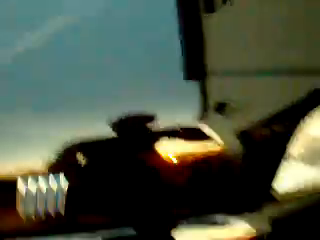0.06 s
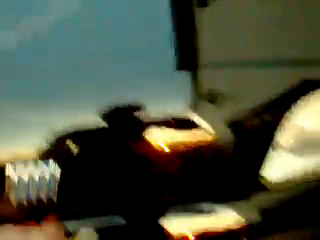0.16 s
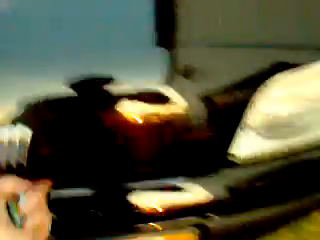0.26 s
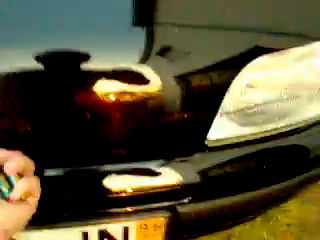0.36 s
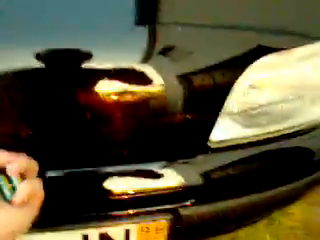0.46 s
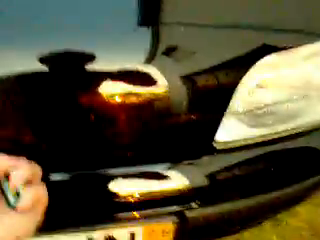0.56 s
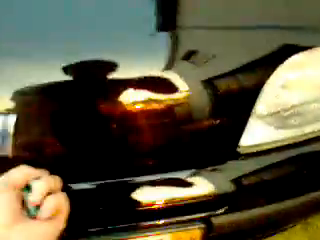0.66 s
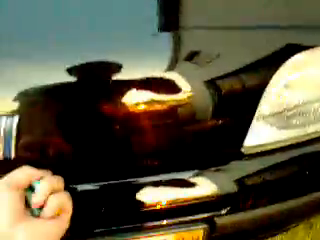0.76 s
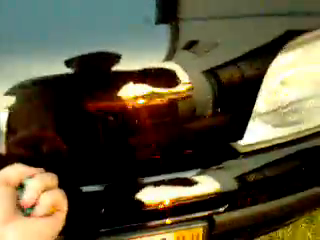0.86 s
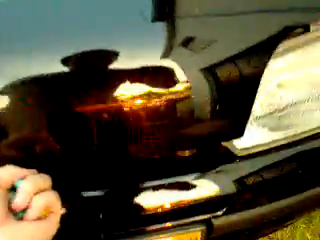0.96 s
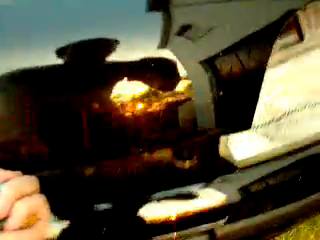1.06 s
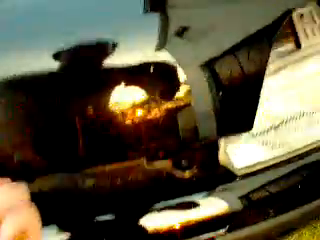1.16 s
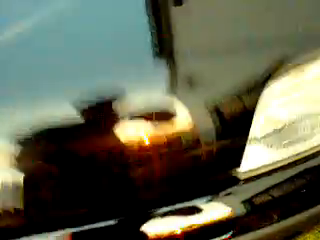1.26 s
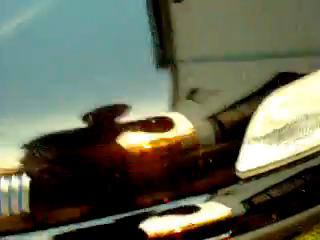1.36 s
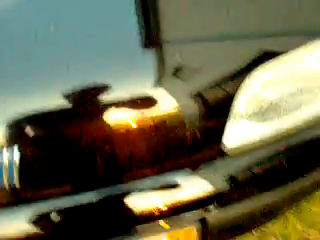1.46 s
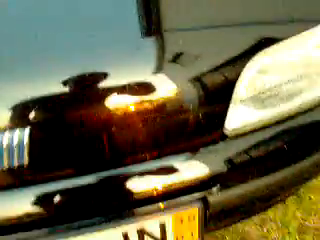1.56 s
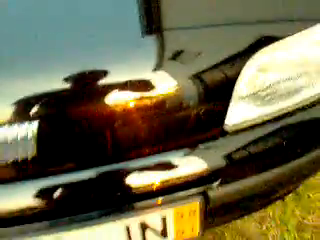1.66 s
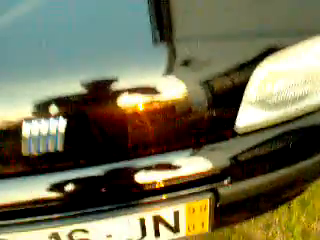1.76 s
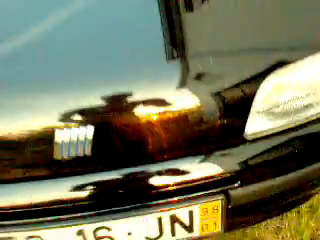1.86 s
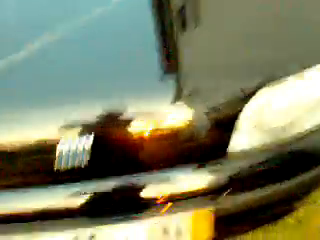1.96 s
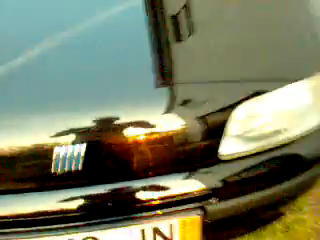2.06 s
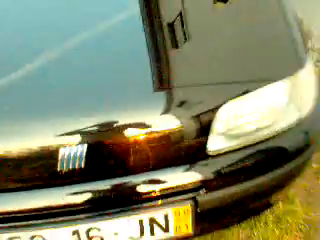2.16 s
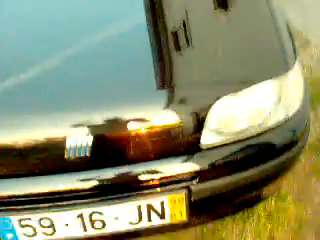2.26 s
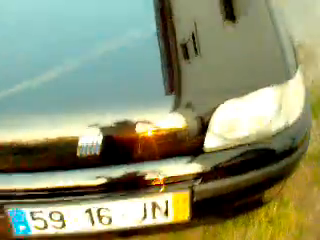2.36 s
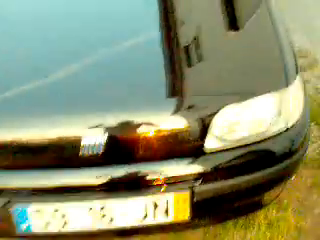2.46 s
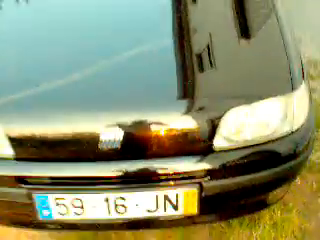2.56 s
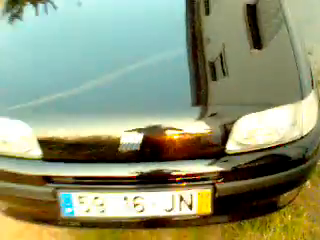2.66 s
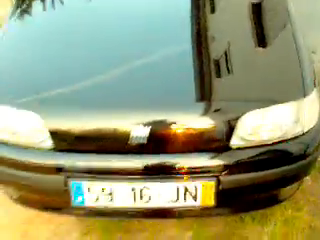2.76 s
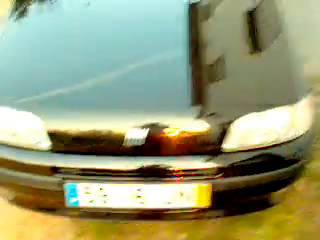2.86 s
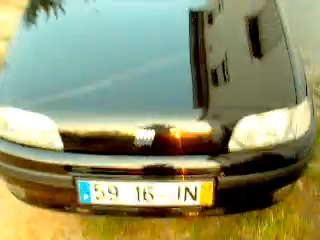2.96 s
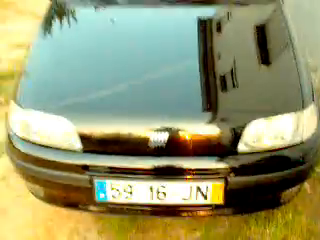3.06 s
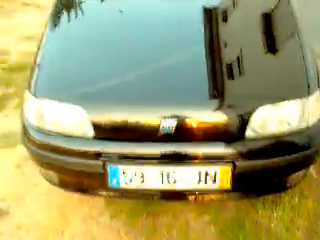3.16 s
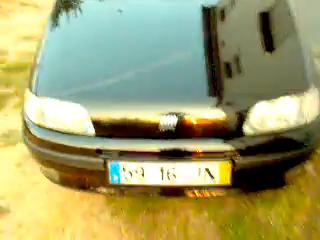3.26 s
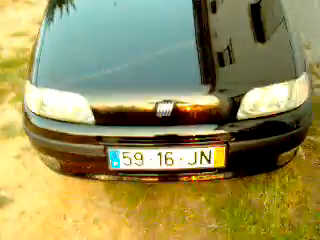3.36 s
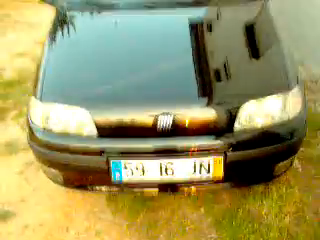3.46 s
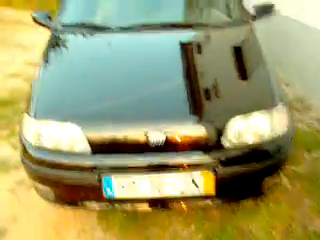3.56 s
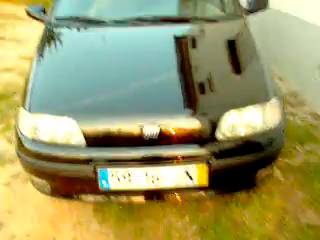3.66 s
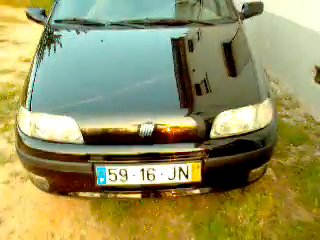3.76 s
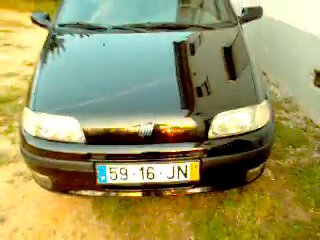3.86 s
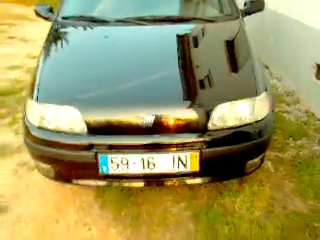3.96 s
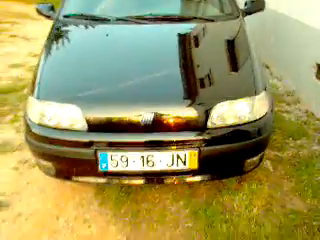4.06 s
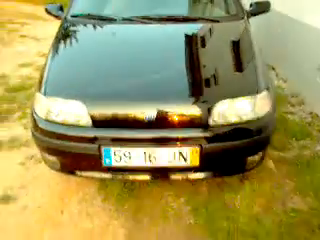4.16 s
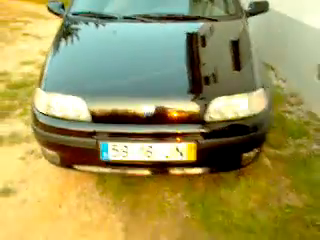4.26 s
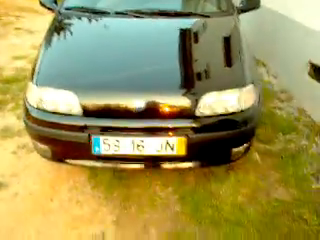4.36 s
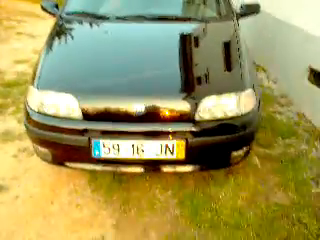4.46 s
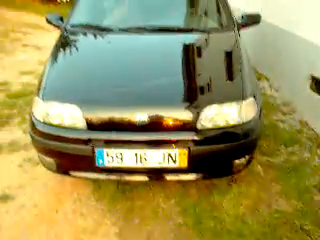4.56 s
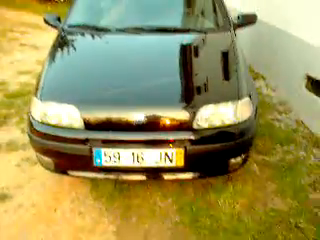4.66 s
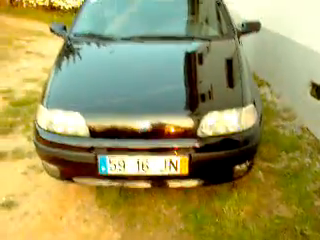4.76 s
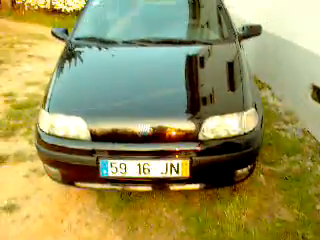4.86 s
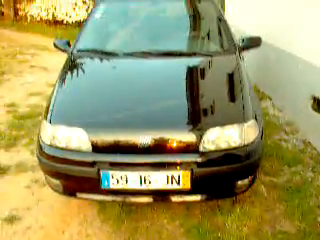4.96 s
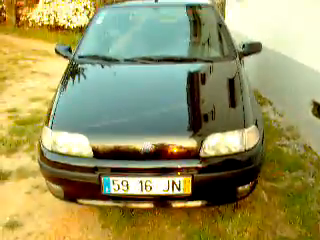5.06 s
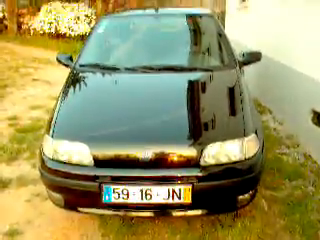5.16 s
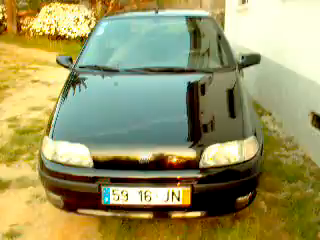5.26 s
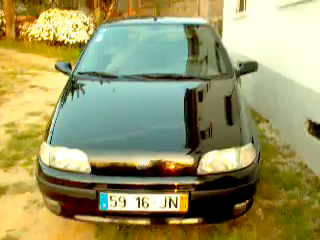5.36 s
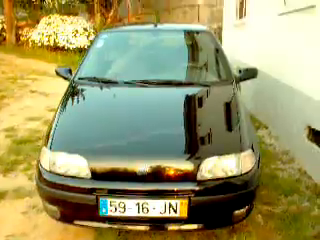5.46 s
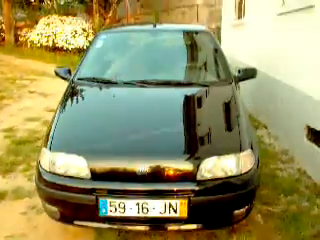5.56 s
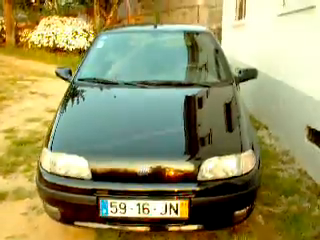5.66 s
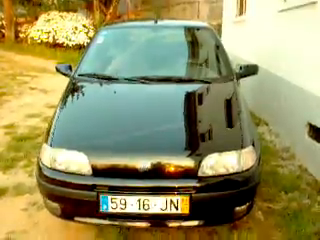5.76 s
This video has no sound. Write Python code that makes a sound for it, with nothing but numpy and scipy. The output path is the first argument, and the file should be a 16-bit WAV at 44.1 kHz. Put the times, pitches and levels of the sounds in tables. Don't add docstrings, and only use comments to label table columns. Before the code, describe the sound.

Outdoors on dry ground, a small hand-held camera picks up a car bonnet at arm's length. Low air and handling rumble, dull steady hiss and a faint low hum run throughout, with tiny ticks about every quarter second. At 0.5 s a light steel knock sounds, a duller one at 0.75 s, then a firmer metallic clunk at 0.85 s as the lid meets its catch. A dull push near 1.18 s leads to the main slam at 1.25 s: very loud, boomy, overloaded and clipped, with a deep air thump and clattering rebounds fading by about 1.5 s. Quiet follows. A small gritty click comes at 2.26 s, sparse shoe crunches from 2.7 to 3.0 s, then a cluster of plastic creaks with a short scuff around 3.3 s. At 4.54 s the camera shell snaps loudly, with a brief scuff. A last sharp click and weak creak come at 5.6 s. Treble is missing.

```python
import sys
import numpy as np
from scipy import signal
from scipy.fft import rfft, irfft, next_fast_len
from scipy.io import wavfile
from scipy.ndimage import map_coordinates

SR = 44100
rng = np.random.default_rng(int(sys.argv[2]) if len(sys.argv) > 2 else 0)


def gain_from_decibels(decibels):
    exponent = np.asarray(decibels, float) / 20
    return 10 ** exponent


def dump_mix(stems):
    frames = np.atleast_2d(stems).T
    limited = np.clip(frames, -1, 1)
    pcm = np.round(limited * 32767).astype(np.int16)
    wavfile.write(sys.argv[1], SR, pcm)


N = 256662

# [t/s, level/dB, brightness/dB per octave, ring length factor, struck spot f/Hz]
KNOCK_BLOWS = [
    (0.5181, -20.5, 1, 0.23, 990),
    (0.52, -25.5, 3, 0.66, 253),
    (0.532, -29.5, -2, 1.05, 312),
    (0.753, -27.5, -4.5, 0.31, 212.5),
    (0.784, -36, -4.5, 0.71, 303),
    (.815, -37.5, -1, 2.1, 520),
]
CATCH_BLOWS = [
    (.839, -16, 1, 0.54, 730),
    (.8405, -13.5, 1, 0.49, 990),
    (.849, -12, -1, 0.37, 440),
    (.866, -28, -5.5, 1.5, 486),
    (0.904, -29, -9, 0.71, 367),
    (.955, -26.5, -5.5, 0.23, 465),
    (1.032, -46, -2, 0.54, 299),
    (1.105, -43.5, 2, 1.8, 790),
]
SLAM_BLOWS = [
    (1.1695, -14.5, 0.5, 0.28, 590),
    (1.177, -8.5, -1.5, 0.76, 199),
    (1.189, -14, -5, 0.22, 403),
    (1.222, -25.5, 0, 1, 301),
    (1.2465, 12, 2.5, 0.32, 990),
    (1.257, 10, 1, 0.39, 800),
    (1.285, -15.5, 5.5, 0.35, 690),
]
RATTLE_BLOWS = [
    (1.296, -0.5, 2, 0.34, 520),
    (1.317, -6.5, -2, 0.6, 156),
    (1.336, -5, 0, 0.44, 513),
    (1.362, -10, 0, 0.45, 323),
    (1.372, -8.5, 1, 0.31, 445),
    (1.39, -13.5, -2.5, 0.52, 156),
    (1.42, -20.5, -6, 0.62, 156),
    (1.445, -30.5, -4.5, 1.42, 240),
]
# [f/Hz, level/dB, t60/s]
STEEL_MODES = [(120.3, -4.5, 0.2), (156, -4, 0.25), (199, 0, 0.25), (229.6, -7.5, 0.38), (267.2, -4, 0.25),
               (312, -4, 0.44), (364, 1, 0.18), (407, -4.5, 0.33), (453, 2, 0.15), (520, -1.5, 0.17),
               (598.4, -3.5, 0.15), (677.5, -12.5, 0.29), (745, -10, 0.23), (896, -6, 0.15),
               (990, -7.5, 0.18), (1067, -5.5, 0.053), (1210, -54.5, .2), (1825, -27, 0.42),
               (2630, -30.5, .1), (3360, -6.5, 0.012)]
# [f/Hz, level/dB, t60/s]
BOOM_MODES = [(30.7, -0.5, 0.33), (44.4, 0, 0.29), (62.3, 2, 0.2), (99.3, -8, 0.64)]
# [f/Hz, t60/s]
CLATTER_DECAY = [(100, 0.45), (400, 0.39), (1000, 0.3), (2500, 0.13), (4000, 0.16)]
# [t/s, level/dB, f/Hz, t60/s]
AIR_THUMPS = [
    (1.174, -8, 100, .2),
    (1.278, 11, 58, .13),
    (1.274, 2, 27, .25),
    (1.308, 12, 55, .045),
]
OPEN_BOOM_DB, CATCH_BOOM_DB, SHUT_BOOM_DB = -16.5, -18.5, -3
DULL_BOOM_DB = 1.43

# [t/s, peak level/dB, ring f/Hz]
GRIT_CLICKS = [(.344, -37, 500), (2.2608, -25, 443), (2.262, -38, 1500), (2.692, -29.5, 526),
               (2.751, -34, 420), (2.765, -30, 2630), (2.779, -33, 2850), (2.782, -35, 960),
               (2.787, -28, 960), (2.857, -31, 530), (2.882, -31, 1020), (2.979, -29.5, 540),
               (2.99, -31, 2030), (2.995, -32, 600), (3.018, -32.5, 530)]
# [t/s, peak level/dB, ring f/Hz, t60/s]
SHELL_CREAKS = [(3.284, -16, 1740, 0.014), (3.2839, -24.5, 770, 0.044), (3.311, -29, 920, 0.037),
                (3.327, -38, 1100, 0.013), (3.333, -19, 1050, 0.015), (3.351, -15, 980, 0.024),
                (3.353, -14.5, 625, 0.016), (3.36, -37, 3800, 0.03), (5.6099, -10.5, 1600, 0.001),
                (5.612, -26.5, 2520, 0.014), (5.661, -25.5, 600, 0.01)]
# [t/s, peak level/dB, ring f/Hz, t60/s]
SHELL_SNAP = [(4.528, -23.5, 1960, 0.017), (4.5325, -16, 1780, 0.013), (4.536, -9, 600, 0.015),
              (4.5373, 1, 955, 0.015), (4.54, -13, 1104, 0.048), (4.543, -11.5, 3470, 0.012),
              (4.5428, -10.5, 433, 0.026), (4.544, -10, 824, 0.029), (4.548, -16, 2520, 0.011),
              (4.5522, -6.5, 2200, 0.0028), (4.557, -17, 960, 0.021), (4.565, -39, 1950, 0.025),
              (4.575, -42, 910, 0.033)]
GRIT_T60_S, GRIT_NOISY, CREAK_NOISY = 0.035, 0.28, 0.36
SNAP_CLEAN_DB, SNAP_NOISY_PER_DB = 1, .04

# [t/s, peak level/dB, rise/s, fall/s]
SHOE_SCUFFS = [
    (2.47, -54.5, .12, 0.14),
    (2.77, -47, 0.01, 0.091),
    (3.05, -68, 0.083, .1),
    (3.33, -37, 0.014, 0.022),
    (4.47, -52.5, .08, 0.057),
    (4.55, -32.5, 0.018, 0.016),
]
SCUFF_REST_DB = -57.5

# [t/s, level/dB]
CAMERA_MOTION = [(0, -25.5), (.1, -37), (.25, -40), (.45, -34.5), (.9, -31.5), (1.1, -37.5), (1.6, -33.5),
                 (1.8, -43), (2.2, -42.5), (2.5, -44.5), (3.1, -42.5), (3.5, -49), (4.5, -44.5), (5, -44),
                 (5.76, -47), (5.82, -48)]
# [f/Hz, level/dB per Hz]
RUMBLE_SPECTRUM = [(4, -21), (15, 3.5), (50, 5), (90, -2), (200, -13.5), (500, -45.5)]
# [f/Hz, level/dB per Hz]
RUSTLE_SPECTRUM = [(60, -21.5), (150, 0.5), (350, 6), (600, -8), (1200, -19.5)]
RUSTLE_DB, RUSTLE_GROWS, CALM_DB = -58, 1.12, -42

# [t/s, peak level/dB]
SUPPLY_STEPS = [(.186, -31), (.440, -29), (1.816, -32), (1.909, -28), (2.2305, -28), (2.487, -28),
                (2.831, -29), (3.116, -26), (3.362, -29), (3.640, -27), (3.9135, -29), (4.1695, -28),
                (4.4155, -30), (4.673, -29), (4.986, -27), (5.232, -28), (5.5007, -29), (5.754, -29)]
# [f/Hz, rms level/dB]
BUFFER_HUM = [(46.9, -60), (62.5, -57), (125, -64), (187.5, -66), (250, -65)]
# [f/Hz, level/dB per Hz]
HISS_SPECTRUM = [(88, -61.5), (150, -11.5), (220, -3), (249, -0.5), (319, -4), (576, -7), (4000, -6.5),
                 (5200, -34), (8800, -120)]


def unit(x):
    return x / np.sqrt(np.mean(x ** 2) + 1e-20)


def along(points, hz):
    f, v = np.transpose(points)
    return np.interp(np.log(hz + 1), np.log(f + 1), v)


def curves(rows):
    s, *cols = np.transpose(rows)
    return [np.interp(np.arange(N) / SR, s, c) for c in cols]


def wobble(rate):
    knots = rng.standard_normal(int(N * rate / SR) + 4)
    return map_coordinates(knots, [np.arange(N) * rate / SR])


def filtered(x, response):
    m = next_fast_len(N + SR // 2)
    return irfft(rfft(x, m) * response(np.fft.rfftfreq(m, 1 / SR)), m)[:N]


def noise(spectrum):
    return unit(filtered(rng.standard_normal(N), lambda hz: gain_from_decibels(along(spectrum, hz))))


def add(track, s, sound):
    part = track[round(s * SR):][:len(sound)]
    part += sound[:len(part)]


def ring(modes, t, stretch, shape_db, start):
    hz, db, t60 = np.transpose(modes)[:, :, None]
    chance = rng.standard_normal((2, len(modes), 1))
    level_db = db + shape_db(hz) + 2 * chance[0]
    envelope = gain_from_decibels(level_db - 60 * t / (t60 * stretch))
    detuned_hz = hz * (1 + 0.012 * chance[1])
    return np.sum(start * envelope * np.sin(2 * np.pi * detuned_hz * t), axis=0)


def bump(hz, centre_hz, octaves):
    return np.exp(-(np.log2((hz + 1) / centre_hz) / octaves) ** 2)


def octaves_up(hz):
    return np.log2(np.maximum(hz, 200) / 400)


def clatter(t, stretch, shape_db):
    hz, frame_s, z = signal.stft(rng.standard_normal(len(t)), SR, nperseg=256)
    low_cut_db = 6 * np.log2(np.maximum(600 / (hz + 40), 1))
    colour_db = shape_db(hz) - 4 * octaves_up(hz) - low_cut_db - 4 * bump(hz, 1500, .35)
    fading_db = -60 * frame_s / (along(CLATTER_DECAY, hz)[:, None] * stretch)
    return signal.istft(z * gain_from_decibels(colour_db[:, None] + fading_db), SR, nperseg=256)[1][:len(t)]


def bonnet_blow(t, db, tilt_db, stretch, spot_hz, boom_db):
    def shape_db(hz):
        return tilt_db * octaves_up(hz) + 9 * bump(hz, spot_hz, 0.15)

    steel = STEEL_MODES
    upper = gain_from_decibels(12) * clatter(t, stretch, shape_db)
    signs = np.sign(rng.standard_normal((len(steel), 1)))
    body = ring(steel, t, stretch, shape_db, signs) + upper
    boom = gain_from_decibels(boom_db - DULL_BOOM_DB * tilt_db) * ring(BOOM_MODES, t, stretch, np.zeros_like, 0.91)
    onset = 1 - np.exp(-t / (.0007 * gain_from_decibels(-3 * tilt_db)))
    return gain_from_decibels(db) * (body + boom) * onset


def bonnet():
    out, t = np.zeros(N), np.arange(SR // 2) / SR
    stages = [(KNOCK_BLOWS, OPEN_BOOM_DB), (CATCH_BLOWS, CATCH_BOOM_DB),
              (SLAM_BLOWS + RATTLE_BLOWS, SHUT_BOOM_DB)]
    for blows, boom_db in stages:
        for s, db, tilt_db, stretch, spot_hz in blows:
            add(out, s, bonnet_blow(t, db, tilt_db, stretch, spot_hz, boom_db))
    for s, db, hz, t60 in AIR_THUMPS:
        add(out, s, gain_from_decibels(db - 60 * t / t60) * np.sin(2 * np.pi * hz * t))
    return out


def clicks():
    out, t = np.zeros(N), np.arange(SR // 10) / SR
    contacts = [(*grain, GRIT_T60_S, GRIT_NOISY) for grain in GRIT_CLICKS]
    contacts += [(*creak, CREAK_NOISY) for creak in SHELL_CREAKS]
    for s, db, hz, t60 in SHELL_SNAP:
        contacts.append((s, db, hz, t60, SNAP_NOISY_PER_DB * (SNAP_CLEAN_DB - db)))
    for s, db, hz, t60, noisy in contacts:
        noisy = np.clip(noisy, 0, 1)
        octave = 0.5 * np.sin(2 * np.pi * 2 * hz * t) * gain_from_decibels(-60 * t / t60)
        tone = np.sin(2 * np.pi * hz * t) + octave
        pole = np.exp(-2 * np.pi * 0.83 * hz / SR)
        two_poles = np.convolve([1, -pole], [1, -pole])
        crack = unit(signal.lfilter([1, -1], two_poles, rng.standard_normal(len(t))))
        add(out, s, gain_from_decibels(db - 3 - 60 * t / t60) * ((1 - noisy) * tone + noisy * crack))
    return out


def scuffs():
    struck = rng.random(N) < 700 / SR
    grains = struck * rng.standard_normal(N) * gain_from_decibels(2.5 * rng.exponential(size=N))

    def grit(f):
        pitches = [(600, 310, 3.0), (2560, 3100, -0.5)]
        return sum(g * 1j * f * w / (c * c - f * f + 1j * f * w) for c, w, g in pitches)

    t = np.arange(N) / SR
    swell = np.zeros(N)
    for s, db, rise, fall in SHOE_SCUFFS:
        swell += gain_from_decibels(db) * np.exp(-np.abs(t - s) / np.where(t < s, rise, fall))
    return (gain_from_decibels(SCUFF_REST_DB) + swell) * unit(filtered(grains, grit))


def air():
    motion_db, = curves(CAMERA_MOTION)
    lumps = wobble(7.7)
    rumble = gain_from_decibels(motion_db) * unit(gain_from_decibels(0.7 * lumps) * noise(RUMBLE_SPECTRUM))
    rustle_db = RUSTLE_DB + RUSTLE_GROWS * (motion_db - CALM_DB)
    flutter = gain_from_decibels(1.7 * lumps + 0.97 * wobble(22))
    return rumble + gain_from_decibels(rustle_db) * unit(flutter * noise(RUSTLE_SPECTRUM))


def electronics():
    out, t = np.zeros(N), np.arange(SR // 20) / SR
    for s, db in SUPPLY_STEPS:
        add(out, s, gain_from_decibels(db) * (.55 * np.exp(-t / .001) + .55 * np.exp(-t / .006)))
    clock = np.arange(N) / SR
    for hz, db in BUFFER_HUM:
        level = gain_from_decibels(db + 2 + 2.5 * wobble(9))
        out += level * np.sin(2 * np.pi * hz * clock + 6 * rng.random())
    offset = -.033
    return out + gain_from_decibels(-48.5) * noise(HISS_SPECTRUM) + offset


def scene():
    return (bonnet() + clicks() + scuffs() + air() + electronics())[None]


def roll_off(x):
    return signal.sosfilt(signal.butter(12, 15890, fs=SR, output="sos"), x)


def record(dry):
    saturated = dry[0] / (1 + np.abs(dry[0] / .71) ** 14) ** (1 / 14)
    narrow = filtered(saturated, lambda hz: np.clip((4200 - hz) / 350, 0, 1) ** 1.12)
    clipped = np.clip(narrow, -.705, .705)[None]
    return roll_off(clipped)


dry = scene()
out = record(dry)
dump_mix(out)
```